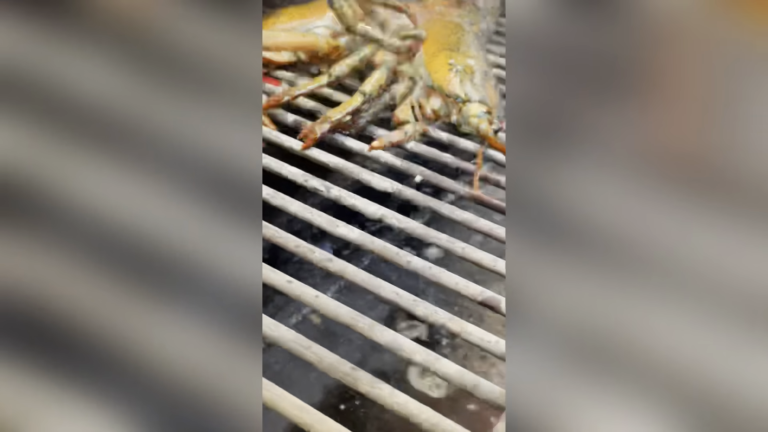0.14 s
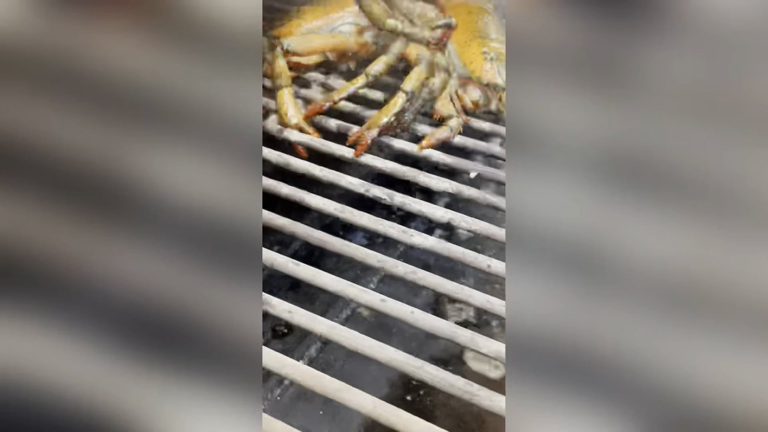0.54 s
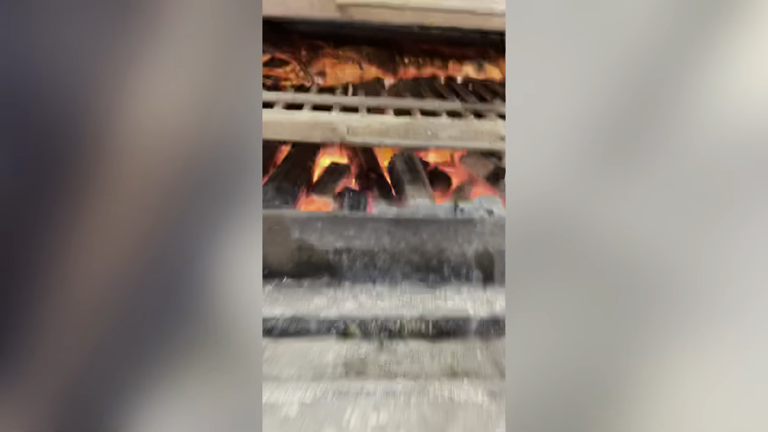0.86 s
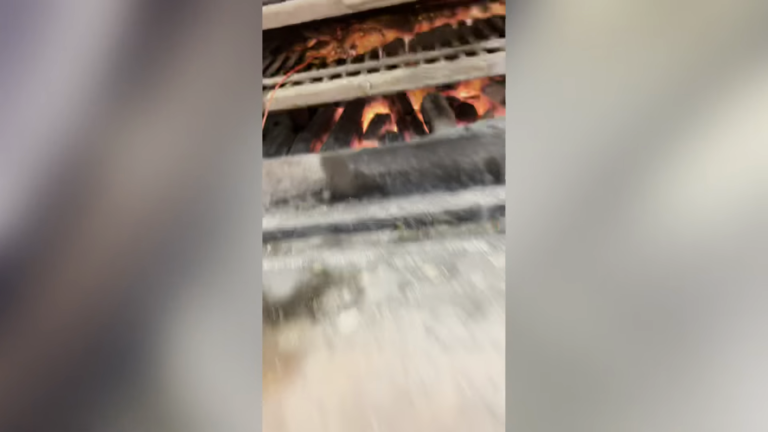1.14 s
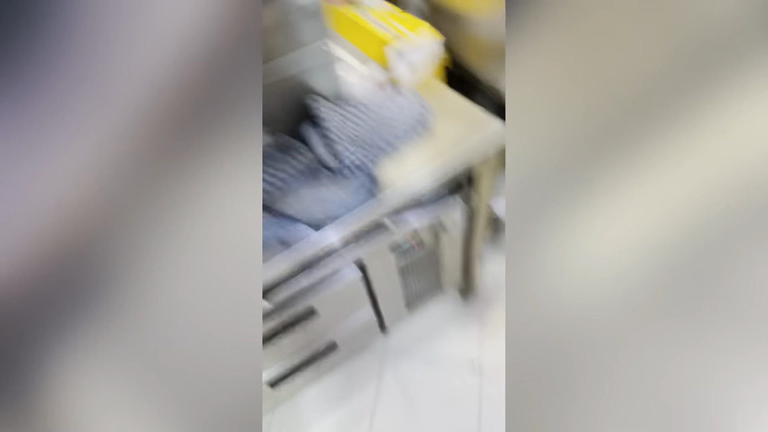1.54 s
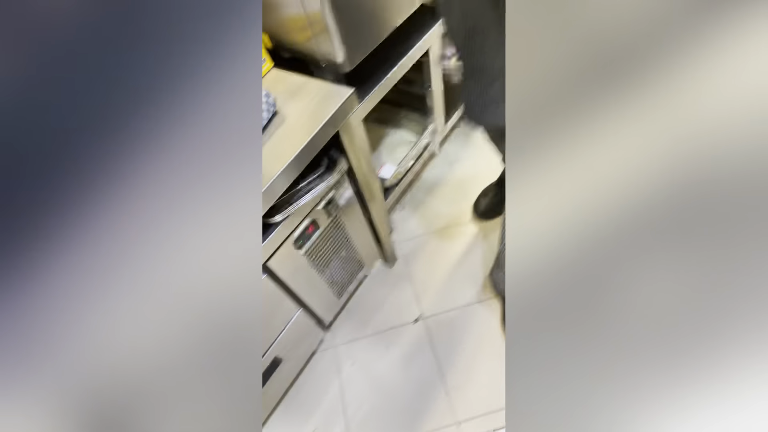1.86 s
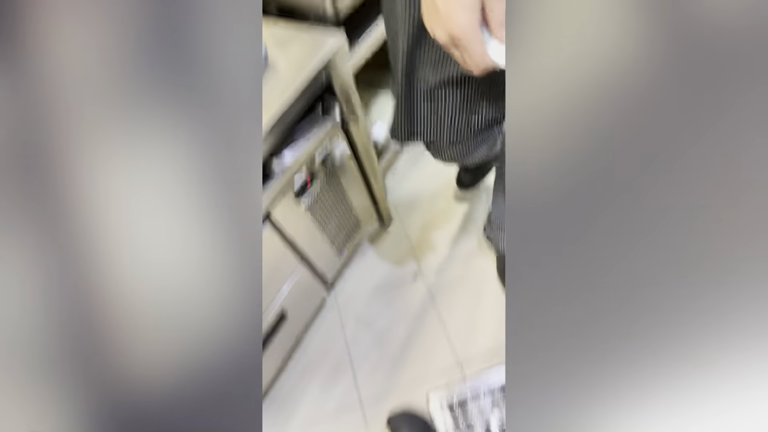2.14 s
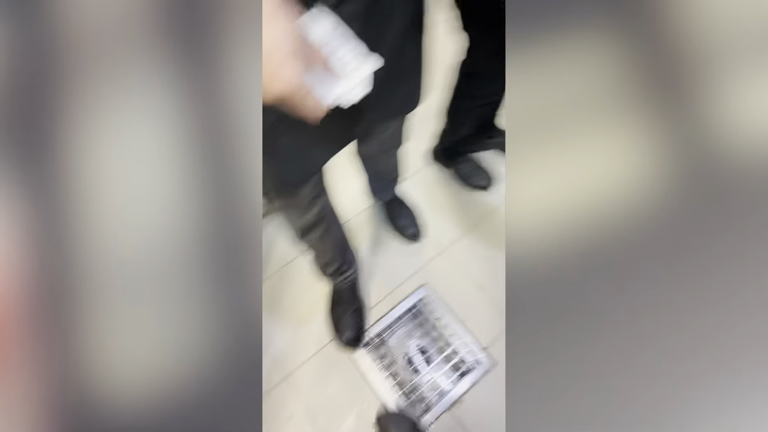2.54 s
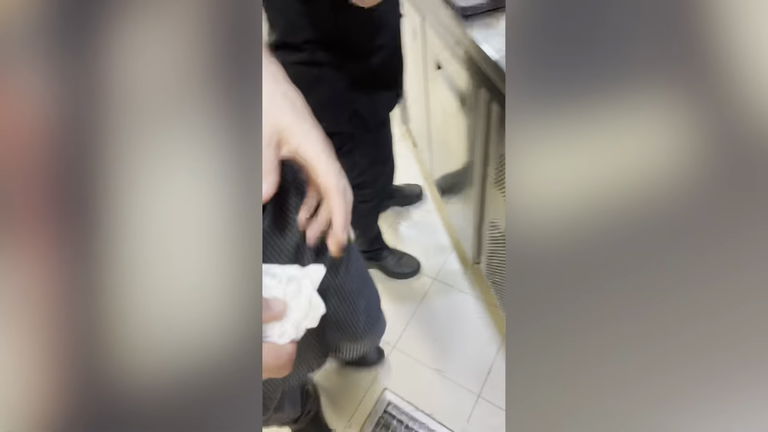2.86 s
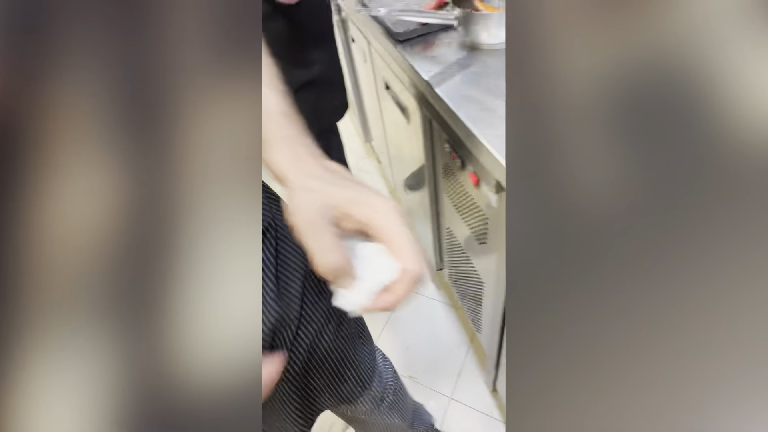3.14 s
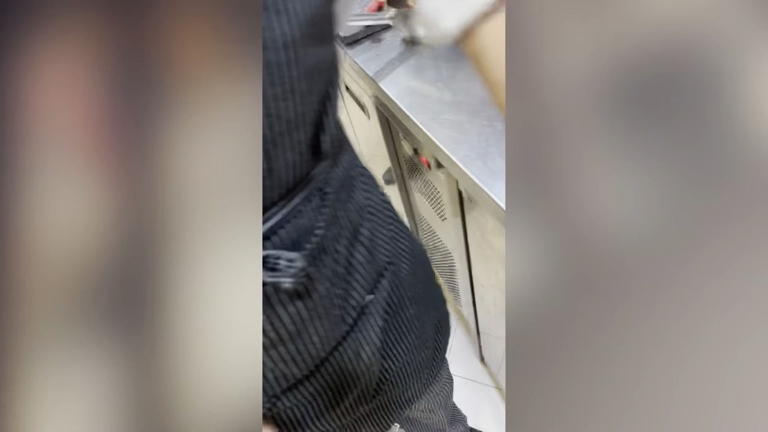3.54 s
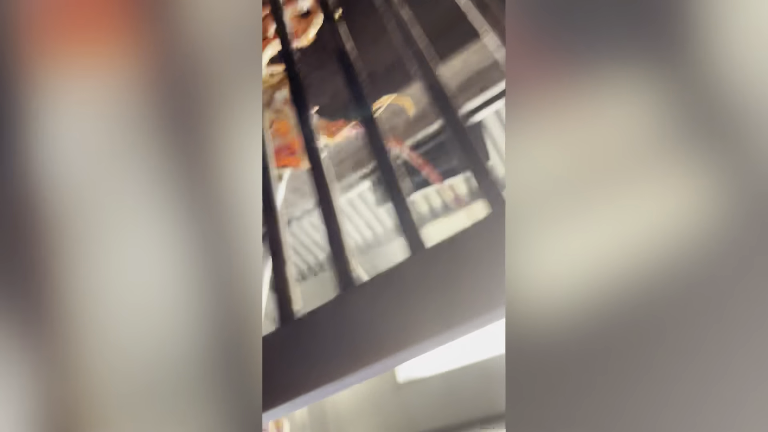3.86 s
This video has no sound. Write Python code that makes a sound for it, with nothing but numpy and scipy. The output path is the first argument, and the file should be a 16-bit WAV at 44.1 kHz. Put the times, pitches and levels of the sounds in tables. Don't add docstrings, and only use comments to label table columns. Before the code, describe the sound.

Steel tongs knock, scrape and ring on a grill grate over sizzling fat and extractor hum

```python
import sys
import numpy as np
from scipy import signal
from scipy.fft import rfft, irfft
from scipy.io import wavfile
from scipy.ndimage import uniform_filter1d

SR = 44100
rng = np.random.default_rng(int(sys.argv[2]) if len(sys.argv) > 2 else 0)


def wav_record(signal):
    frames = np.transpose(np.atleast_2d(signal))
    bounded = np.clip(frames, -1, 1)
    quanta = np.round(bounded * 32767).astype(np.int16)
    wavfile.write(sys.argv[1], SR, quanta)


def makeup_ratio(level_db):
    decades = np.asarray(level_db, float) / 20
    return 10 ** decades


N = 176400
CUT_S = .796


def evened(x):
    return x / np.sqrt(np.mean(x ** 2) + 1e-20)


def read(points, hz):
    f, value = np.transpose(points)
    return np.interp(np.log(hz + 1), np.log(f + 1), value)


def curve(points, order=1):
    columns = np.transpose(points)
    return np.interp(np.arange(N) / SR, columns[0], columns[order])


def add(mix, s, sound):
    part = mix[:, round(s * SR):][:, :sound.shape[1]]
    part += sound[:, :part.shape[1]]


def body_ring(body, blur, t):
    ring = 0
    for hz, db, t60 in body:
        detuned = hz * np.outer(1 + 0.01 * rng.uniform(-0.69, 1, size=3), t)
        tone = np.sin(2 * np.pi * hz * t) + blur * np.sin(2 * np.pi * detuned).sum(0)
        ring = ring + makeup_ratio(db - 60 * t / t60) * tone
    return ring / np.linalg.norm(ring[:1300])


def body_colour(body):
    hz, top_db = np.transpose(body)[:2]
    points = np.r_[0, hz[0] * .9, hz, min(hz[-1] * 1.3, SR * .45), SR / 2]
    gains = np.r_[0, 0, makeup_ratio(uniform_filter1d(top_db, size=3)), 0, 0]
    wide = signal.firwin2(513, points, gains, fs=SR)
    return wide / np.linalg.norm(wide)


def strike(body, rows, wide_db, left_db, blur):
    out, t = np.zeros((2, N)), np.arange(SR // 2) / SR
    ring, wide = body_ring(body, blur, t), body_colour(body)
    for s, db, rise, t60 in rows:
        swell = np.minimum(t / rise, 1) * makeup_ratio(-60 * np.maximum(t - rise, 0) / t60)
        grit = evened(uniform_filter1d(rng.standard_normal(len(t)), size=90))
        rub = rng.standard_normal((2, len(t))) * swell * makeup_ratio(3.5 * grit)
        if rise < .005:
            rub[:, int(rise * SR)] += 6
        ringing = signal.fftconvolve(rub, ring[None], axes=1)[:, :len(t)]
        noise = signal.fftconvolve(rub, wide[None], axes=1)[:, 256:256 + len(t)]
        sound = ringing + makeup_ratio(wide_db) * noise
        loudest = np.sqrt(uniform_filter1d((sound ** 2).mean(0), size=441).max())
        add(out, s, makeup_ratio(db) * sound / loudest)
    return out * makeup_ratio([[left_db], [-left_db]])


def rings(rows):
    out, t = np.zeros((2, N)), np.arange(SR // 2) / SR
    port_phase = np.array([[0], [np.pi / 2]])
    for s, hz, db, swell, t60 in rows:
        rise = np.sin(np.pi / 2 * np.minimum(t / swell, 1))
        shape = rise * makeup_ratio(db - 60 * np.maximum(t - swell, 0) / t60)
        beat = 1 + .4 * np.cos(2 * np.pi * .013 * hz * (t - swell))
        add(out, s, shape * beat * np.sin(2 * np.pi * hz * t - port_phase))
    return out


# [f/Hz, level/dB, t60/s]
FIRST_BAR = [(647, -4, 0.032), (880, -10, 0.07), (1000, 1.5, 0.044), (1545, -9, 0.031), (1760, -17, 0.18),
             (2050, 2, 0.032), (2250, -11, .3), (2540, -7, 0.24), (2563, -9, .25), (3370, -11, 0.15),
             (3600, -2, 0.031), (3860, -2, 0.072), (4850, -8.5, 0.081)]
SECOND_BAR = [(610, -15, 0.1), (840, 1, 0.027), (1130, -2, 0.035), (1360, -4.5, 0.047), (1832, -1, 0.079),
              (2120, -2, 0.022), (2712, -5.5, 0.047)]
DRAGGED_BAR = [(618, -11.5, 0.41), (1029.7, -2, .5), (1110, -1, .08), (1266, -12.5, 0.19), (1740, -8, 0.31),
               (1840, -8, 0.071), (2376, -10, 0.07), (2610, -8, 0.28), (3370, -15, 0.16), (3440, -16, 0.22),
               (3881, -14, .19), (4317, -15, 0.22), (4750, -19, 0.32), (5090, -15, .06)]
# [t/s, level/dB, rise/s, t60/s]
FIRST_KNOCKS = [
    (.1085, -18, .0025, 0.091),
    (.117, -23, 0.0039, 0.087),
    (.135, -42, 0.0029, .1),
]
SECOND_KNOCKS = [
    (.233, -22, 0.0037, .1),
    (.24, -18, 0.0063, 0.063),
    (.262, -25, 0.00293, 0.067),
]
DRAG = [
    (.487, -27, 0.0027, 0.25),
    (.56, -30, .07, .5),
    (.63, -34, 0.0037, 0.18),
    (.70, -34, 0.0051, 0.083),
    (.6885, -27, 0.0027, 0.18),
    (.7115, -17, 0.00202, 0.12),
    (.738, -24.5, 0.0031, 0.23),
    (.77, -19.5, 0.025, .22),
]
# [t/s, f/Hz, level/dB, swell/s, t60/s]
GRATE_RINGS = [
    (.112, 630, -22.5, 0.0038, 0.068),
    (.115, 1000, -21, 0.0049, 0.047),
    (.122, 1760, -27, 0.033, .5),
    (.688, 2620, -32, .005, 0.27),
    (.238, 2710, -26.5, .006, 0.12),
    (.24, 1832, -22.5, 0.0071, 0.15),
    (.712, 1072, -16.5, .006, 0.078),
    (.712, 2358, -21, 0.0054, 0.15),
    (.118, 2300, -27.5, 0.0092, .4),
]


def tongs():
    first = strike(FIRST_BAR, FIRST_KNOCKS, wide_db=-2.5, left_db=-0.5, blur=.2)
    second = strike(SECOND_BAR, SECOND_KNOCKS, wide_db=-1.5, left_db=-2, blur=.3)
    drag = strike(DRAGGED_BAR, DRAG, wide_db=-2.5, left_db=1.2, blur=0.54)
    return first + second + drag + rings(GRATE_RINGS)


# [f/Hz, level/dB, t60/s]
RACK = [(1350, 3, .02), (2400, -5, 0.03), (3370, -4, 0.18), (3940, 6, 0.014), (5340, -3, .05),
        (8350, -6, 0.054), (11660, -16, .04), (14900, -5, .04)]
# [t/s, level/dB, rise/s, t60/s]
SLIDES = [
    (.83, -33, 0.0056, 0.97),
    (1.018, -23.5, 0.0032, 0.26),
    (1.051, -27, 0.0031, 0.17),
    (1.14, -28.5, .004, 0.26),
    (1.217, -28, 0.0038, 0.21),
    (1.271, -33, 0.0037, 0.059),
]


def rack():
    return strike(RACK, SLIDES, wide_db=6.5, left_db=1, blur=0.45)


# [f/Hz, level/dB, t60/s]
NOZZLE = [(3600, -1, 0.011), (4030, 3, 0.017), (4460, -8.5, .008), (5050, -1.5, 0.011), (5330, -1, .01),
          (5940, 3.5, .012), (6450, 2, 0.0095), (7700, -5, 0.0067), (10600, -8.5, .006),
          (12800, -12.5, .005)]
# [t/s, level/dB, rise/s, t60/s]
PUFFS = [
    (2.661, -20.5, .0011, .16),
    (2.668, -18.5, 0.0069, 0.21),
    (2.70, -28.5, 0.013, 0.52),
    (3.277, -24.5, 0.0017, 0.15),
    (3.279, -22, 0.0045, 0.38),
    (3.382, -33.5, .0061, 0.68),
]


def puffs():
    return strike(NOZZLE, PUFFS, wide_db=2.5, left_db=0, blur=.4)


# [f/Hz, level/dB, t60/s]
BIN = [(135, -29, .08), (265, -1, 0.14), (343, -4, .06), (388, -5, 0.066), (496, 2, .05), (620, -5, 0.037),
       (750, -11, 0.042), (885, -10, 0.025), (1030, 4, 0.11), (1254, -7, 0.031), (1370, -11, 0.075),
       (1680, -9, 0.026), (2250, -13, .03)]
# [t/s, level/dB, rise/s, t60/s]
THUDS = [
    (2.750, -15.5, 0.0021, 0.19),
    (2.785, -22.5, 0.00284, 0.11),
    (2.815, -28.5, 0.0045, 0.046),
]


def thud():
    return strike(BIN, THUDS, wide_db=0.0, left_db=3.3, blur=.4)


# [t/s, f/Hz, level/dB, swell/s, t60/s]
FAR_RINGS = [
    (1.045, 5260, -33, .01, .2),
    (1.145, 5250, -31, .02, 0.24),
    (1.22, 5220, -33, .01, 0.25),
    (1.24, 3370, -38, 0.026, 0.6),
    (.85, 5120, -37.5, 0.024, 0.25),
    (2.752, 252, -13.5, .014, .13),
]


def rail_and_wall():
    return rings(FAR_RINGS)


# [f/Hz, level/dB, t60/s]
LATCH = [(2420, -6, 0.014), (2920, 0, 0.038), (3800, -16, .004), (4600, -18, .004), (5700, 6, 0.0068),
         (7300, 2, 0.0034), (9600, 5, 0.0035), (11150, 3.5, 0.0022), (13300, 5, 0.0026),
         (15000, -7, 0.0036)]
# [t/s, level/dB, rise/s, t60/s]
CLICKS = [
    (2.750, -24.5, .001, 0.016),
    (2.782, -30, .001, 0.012),
    (3.538, -18, .001, 0.011),
    (3.5665, -26, .001, 0.018),
]


def clicks():
    return strike(LATCH, CLICKS, wide_db=-6.5, left_db=-0.5, blur=.4)


# [f/Hz, level/dB, t60/s]
KNOB = [(1000, 0, .02), (1600, 0, .02), (2200, -3, .02), (4300, -14, .015)]
# [t/s, level/dB, rise/s, t60/s]
TAPS = [
    (3.566, -30.5, .002, .03),
    (3.595, -35, 0.0025, 0.05),
    (3.625, -31.5, 0.00198, 0.022),
]


def taps():
    return strike(KNOB, TAPS, wide_db=1, left_db=-0.5, blur=.4)


# [t/s, level/dB, length/s, f/Hz]
SHUFFLES = [
    (1.79, -28, 0.096, 590),
    (1.828, -23, 0.14, 75.4),
    (1.947, -36, 0.04, 5530),
    (2, -30.5, 0.05, 3200),
    (2.192, -33, 0.15, 2480),
    (2.317, -29, 0.15, 2980),
]


def shuffles():
    out, n = np.zeros((2, N)), int(.15 * SR)
    t = np.arange(n) / SR
    for s, db, length, hz in SHUFFLES:
        grain = evened(uniform_filter1d(rng.standard_normal(n), size=150))
        grit = rng.standard_normal((2, n)) * makeup_ratio(3.1 * grain)
        sos = signal.butter(1, [hz / 4.6, hz * 0.97], "bandpass", fs=SR, output="sos")
        swell = np.sin(np.pi * np.clip(t / length, 0, 1) ** 0.35)
        add(out, s, makeup_ratio(db) * evened(signal.sosfilt(sos, grit)) * swell)
    return out


def falling_thumps(rows, right):
    length_s, fall_s, end_hz = .014, .0035, 210
    out, t = np.zeros((2, N)), np.arange(0, length_s, 1 / SR)
    for s, db, hz in rows:
        turns = np.cumsum(end_hz + hz * np.exp(-t / fall_s)) / SR
        swell = np.sin(np.pi * (t / length_s) ** .5)
        add(out, s, makeup_ratio(db) * np.array([[.5], [.5 * right]]) * np.sin(2 * np.pi * turns) * swell)
    return out


# [t/s, level/dB, start f/Hz]
BUMPS = [
    (1.554, -19, 1200),
    (1.690, -12, 2200),
    (2.193, -15, 1400),
    (2.319, -13, 2000),
]
# [t/s, level/dB, start f/Hz]
THUD_DIVE = [
    (2.7495, -7, 2400),
]


def case_bumps():
    return falling_thumps(BUMPS, right=-0.96) + falling_thumps(THUD_DIVE, right=0.8)


# [f/Hz, level/dB]
SIZZLE = [(1500, -4.5), (5000, -5), (9000, 0), (13000, -6), (15500, 1)]


def sizzle():
    roughness = uniform_filter1d(rng.exponential(1, N) - 1, size=9) * 2.8
    return makeup_ratio(-26.5) * evened(makeup_ratio(-0.5 * roughness) * air(SIZZLE, patchy_db=1.5, flicker_db=0.75))


# [t/s, level/dB]
RUMBLE_LEVEL = [(0.0, -29.5), (1.73, -24.5), (4.0, -31)]
# [t/s, hiss level/dB, fizz level/dB]
HISS_LEVEL = [(0, -47, -55), (.79, -39, -53), (.83, -29, -50), (1.3, -32, -37.5), (1.42, -34.5, -65),
              (1.92, -38.5, -41), (1.97, -34.5, -32.5), (2.45, -36.5, -34), (2.55, -40, -35.5),
              (3.5, -38, -35), (3.65, -40.5, -33.5), (4, -46.5, -33.5)]
# [f/Hz, level/dB]
RUMBLE = [(18, -55), (45, -13.5), (85, -1), (160, -6.5), (300, -9.5), (600, -14), (1200, -20.5),
          (2500, -37.5)]
HISS = [(500, 6.5), (1500, 2.5), (2500, 6), (4500, -3), (6000, -1), (9000, -4), (15500, -26)]
# [f/Hz, width/Hz, level/dB, drift/dB per s]
HUMS = [(80.66, 11, -33.5, -0.9), (201.7, 10.7, -33.5, -1.33), (293.2, 4.3, -34.5, 1.46),
        (509, 22, -44, -2.1), (1477, 4.6, -51.5, 0.7)]


def hood():
    t, hums = np.arange(N) / SR, 0
    for hz, width_hz, db, drift_db in HUMS:
        pole = np.exp(-np.pi * width_hz / SR)
        noise = rng.standard_normal((2, N)) + 1j * rng.standard_normal((2, N))
        waver = signal.lfilter([1], [1, -pole], noise)
        tone = evened((waver * np.exp(2j * np.pi * hz * t)).real)
        hums = hums + makeup_ratio(db + drift_db * (t - 1.5)) * tone
    rumble = makeup_ratio(curve(RUMBLE_LEVEL)) * air(RUMBLE, patchy_db=0.82, flicker_db=1.0)
    hiss = makeup_ratio(curve(HISS_LEVEL)) * air(HISS, patchy_db=1.2, flicker_db=.6)
    fizz = makeup_ratio(curve(HISS_LEVEL, order=2)) * air(SIZZLE, patchy_db=.9, flicker_db=.5)
    return rumble + hums + hiss + fizz


def air(shape, patchy_db, flicker_db):
    a, b, c, d, patch = rng.standard_normal((N // 128 + 6, 257, 5)).T
    flicker = evened(uniform_filter1d(patch[0], size=5))
    patch = uniform_filter1d(patch, size=6, axis=0)
    patch = evened(uniform_filter1d(patch, size=20, axis=1))
    z = np.array([a + 1j * b, c + 1j * d]) * makeup_ratio(patchy_db * patch + flicker_db * flicker)
    x = signal.istft(z, nperseg=512, noverlap=384)[1][:, :N]
    colour = makeup_ratio(read(shape, np.fft.rfftfreq(N, 1 / SR)))
    return evened(irfft(rfft(x) * colour, N))


def kitchen(x, room_db):
    n = SR // 2
    taps = np.zeros((2, n))
    at = np.arange(300, n - 20, 20) + rng.integers(0, 20, (2, (n - 301) // 20))
    np.put_along_axis(taps, at, rng.choice([-1., 1.], at.shape), 1)
    taps = taps * makeup_ratio(-60 * np.arange(n) / SR / 0.31)
    tail = signal.fftconvolve(x, taps / np.linalg.norm(taps[0]), axes=1)[:, :N]
    return x + makeup_ratio(room_db) * tail


# [f/Hz, lag/rad]
LAG = [(5000, 0), (5510, 0), (6980, 3), (8180, 3.5), (10400, 5.5), (11600, 6.4), (13600, 9.5),
       (15500, 10.5)]
# [f/Hz, share/1]
SAME_NEAR = [(250, 1), (600, 0.3), (1100, -0.096), (1700, 0.78), (4500, 0.71), (5200, 0.86), (6500, 0.73),
             (8000, 0.99)]
SAME_FAR = [(250, 1), (600, 0.44), (1200, 0.01), (4500, 0.15), (5400, 0.74), (6500, 0.6), (8200, .995),
            (14000, 0.82)]


def ports(x, same):
    hz = np.fft.rfftfreq(N, 1 / SR)
    left, own = rfft(x)
    share = np.clip(read(same, hz), -1, 1 - 1 / 1000)
    late = np.exp(-1j * read(LAG, hz)) * left
    return irfft(np.array([left, share * late + np.sqrt(1 - share ** 2) * own]), N)


def scene():
    room_db, click_room_db = -6.5, -22
    fan = hood()
    near = ports(fan + sizzle() + kitchen(tongs(), room_db), SAME_NEAR)
    work = rack() + puffs() + thud() + taps() + shuffles() + rail_and_wall()
    room = kitchen(work, room_db) + kitchen(clicks(), click_room_db)
    far = ports(fan + room, SAME_FAR) + case_bumps()
    since = np.arange(N) / SR - CUT_S
    grill = np.clip(-since / 0.0006, 0, 1)
    swell = makeup_ratio(-10.5 * np.clip(1 - since / 0.019, 0, 1))
    return grill * near + (1 - grill) * far * swell


def top_cut(x):
    return signal.sosfilt(signal.butter(12, 15940, fs=SR, output="sos"), x)


def record(dry):
    low_cut = signal.butter(2, 23, "highpass", fs=SR, output="sos")
    edge = signal.firwin(2047, 15900, window=("kaiser", 9), fs=SR)
    mix = signal.oaconvolve(signal.sosfilt(low_cut, dry), edge[None], "same")
    return top_cut(mix)


dry = scene()
out = record(dry)
wav_record(out)
```